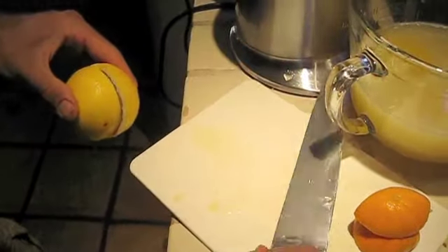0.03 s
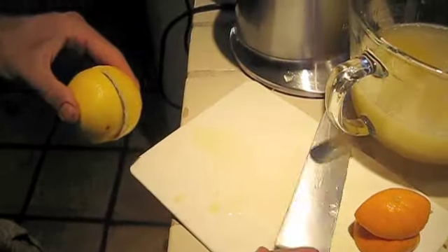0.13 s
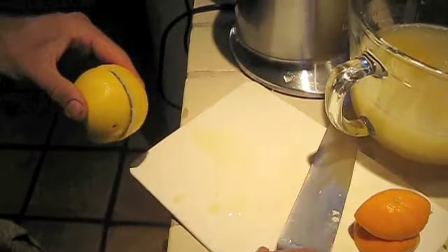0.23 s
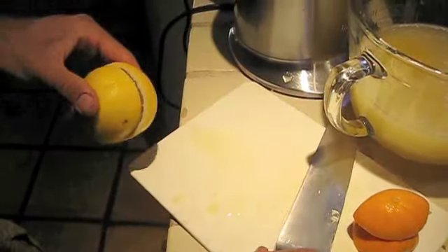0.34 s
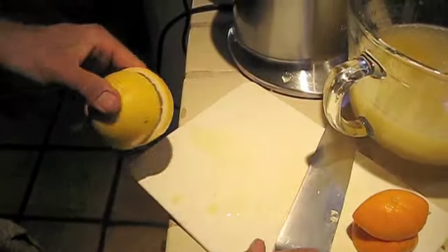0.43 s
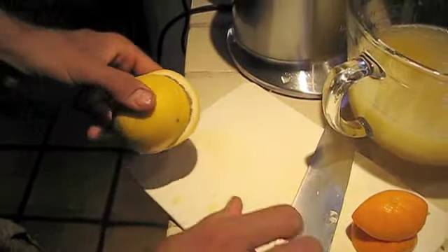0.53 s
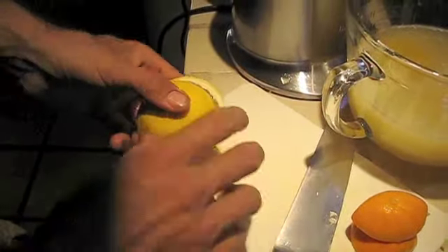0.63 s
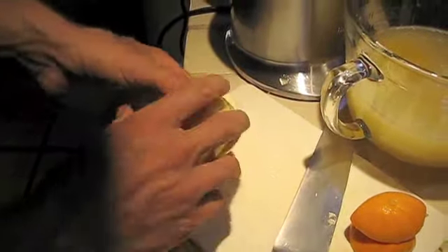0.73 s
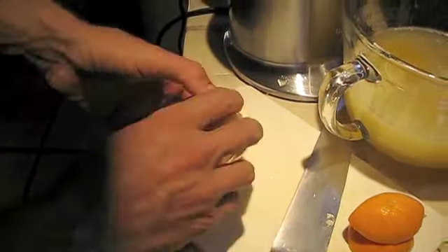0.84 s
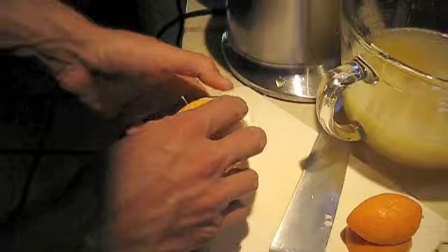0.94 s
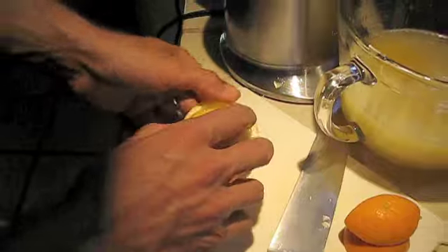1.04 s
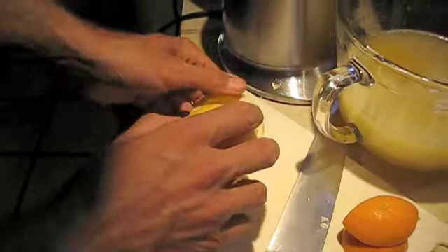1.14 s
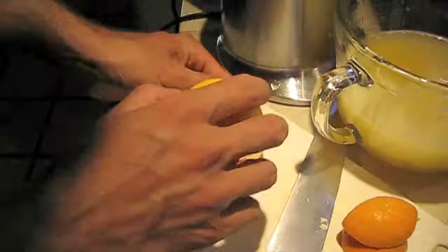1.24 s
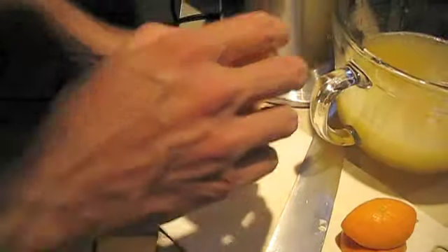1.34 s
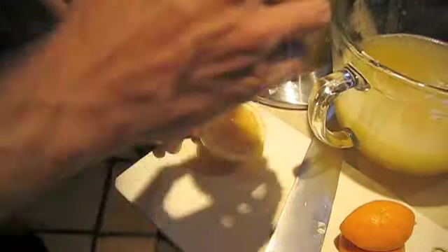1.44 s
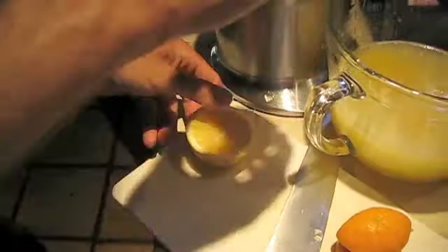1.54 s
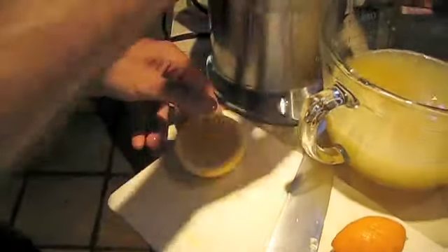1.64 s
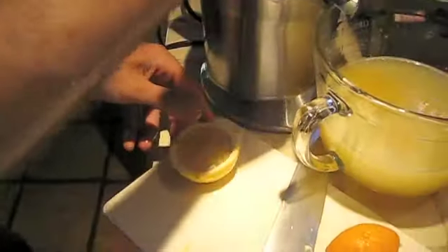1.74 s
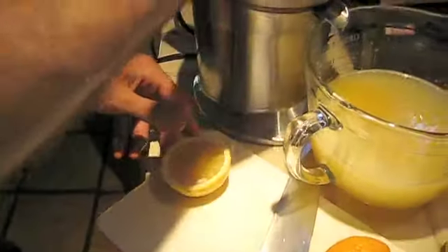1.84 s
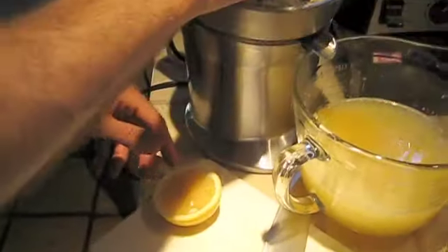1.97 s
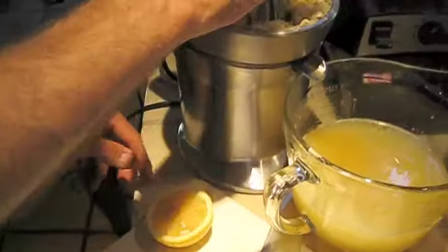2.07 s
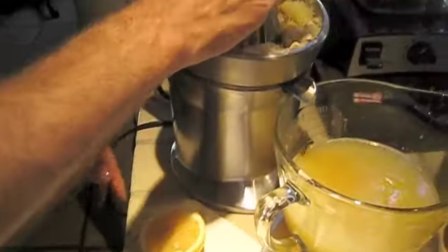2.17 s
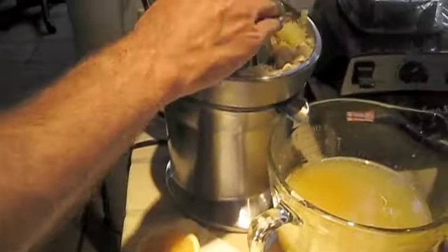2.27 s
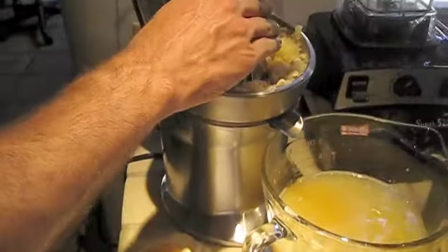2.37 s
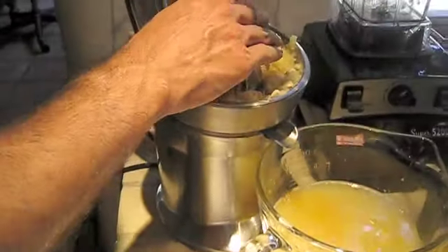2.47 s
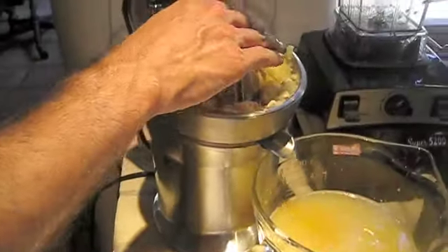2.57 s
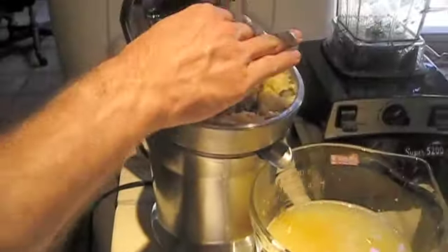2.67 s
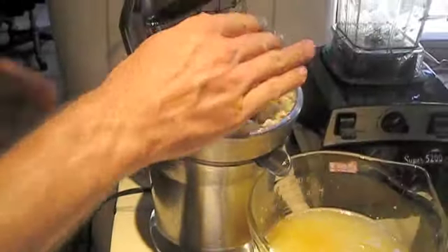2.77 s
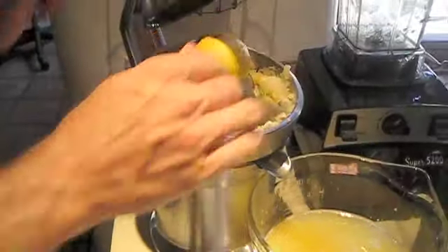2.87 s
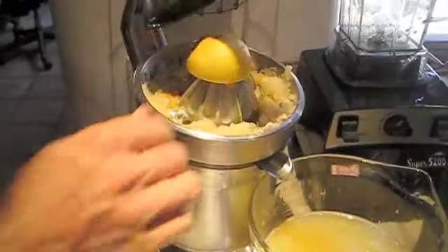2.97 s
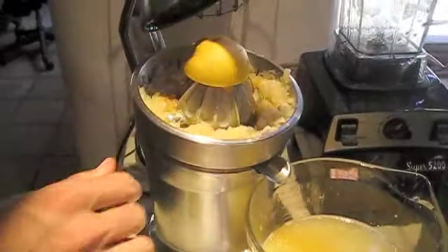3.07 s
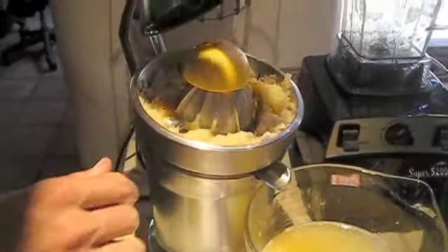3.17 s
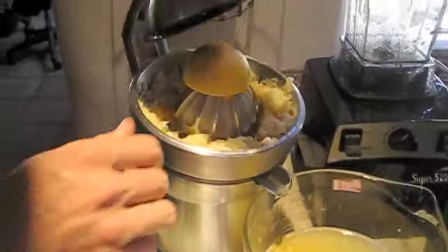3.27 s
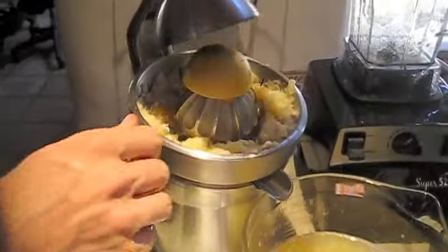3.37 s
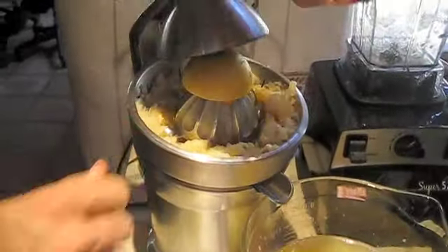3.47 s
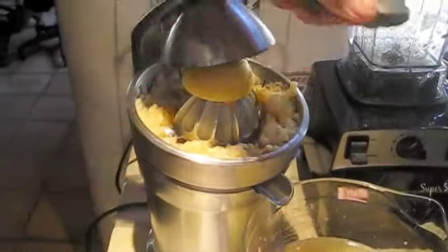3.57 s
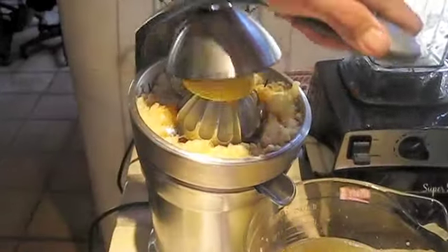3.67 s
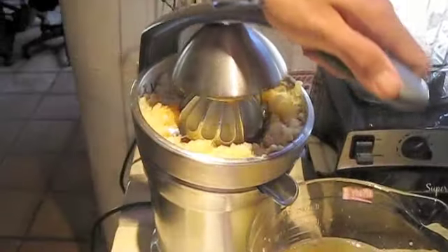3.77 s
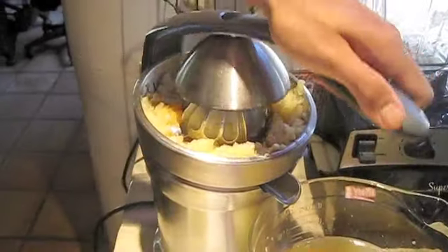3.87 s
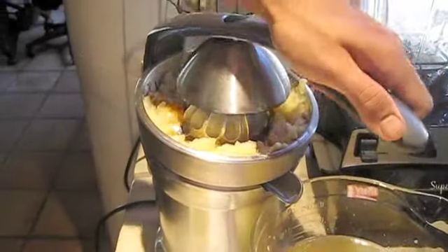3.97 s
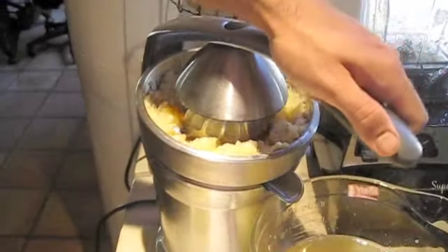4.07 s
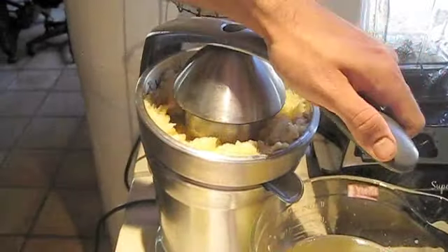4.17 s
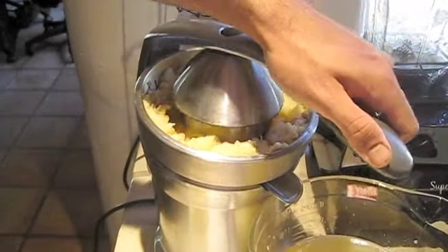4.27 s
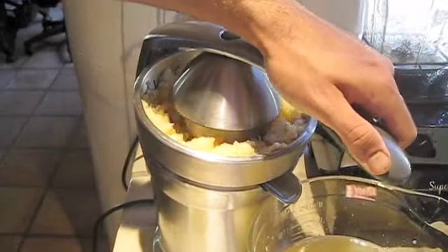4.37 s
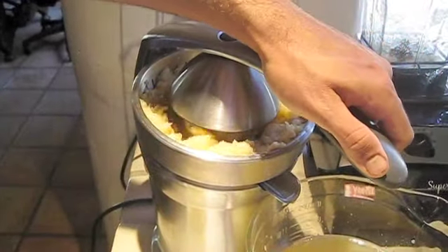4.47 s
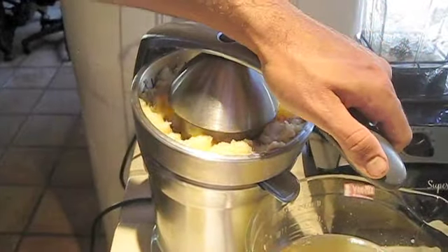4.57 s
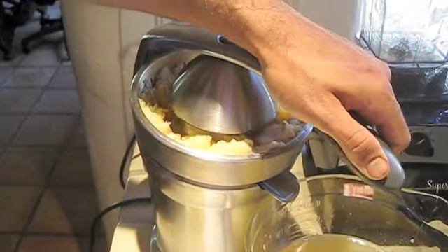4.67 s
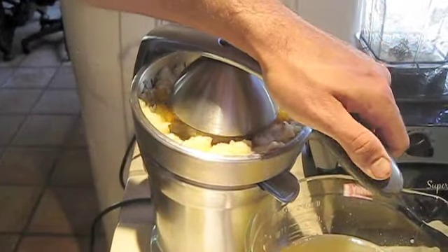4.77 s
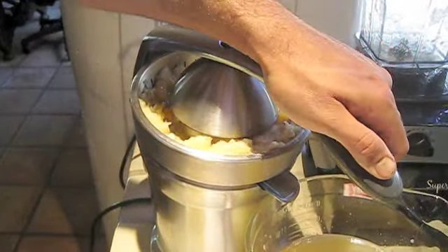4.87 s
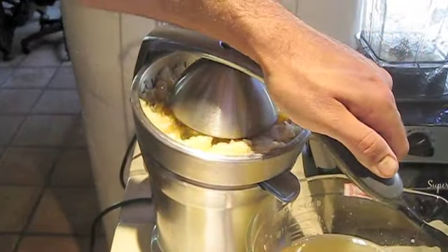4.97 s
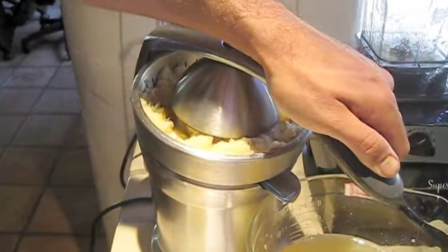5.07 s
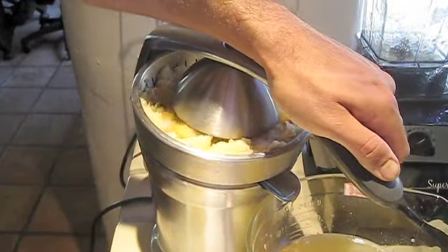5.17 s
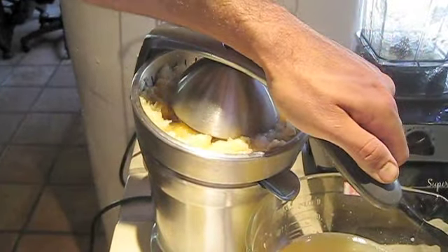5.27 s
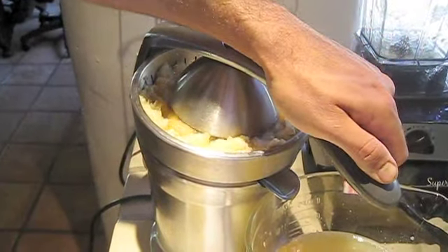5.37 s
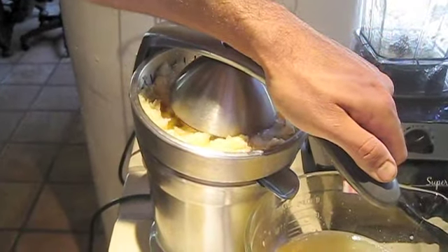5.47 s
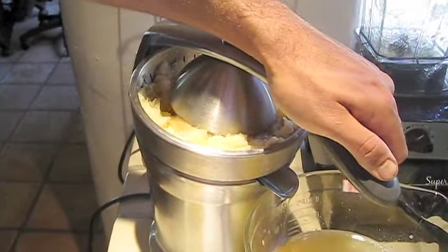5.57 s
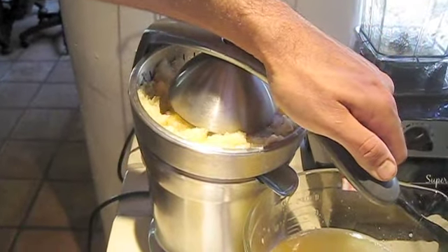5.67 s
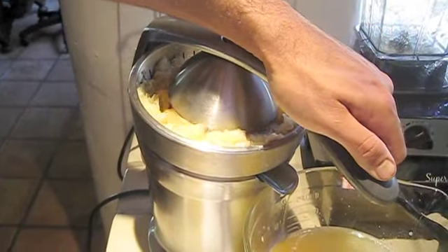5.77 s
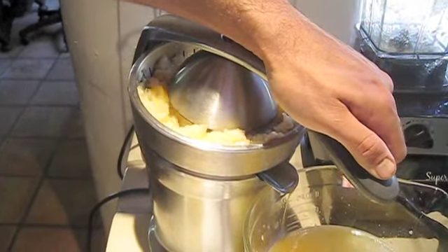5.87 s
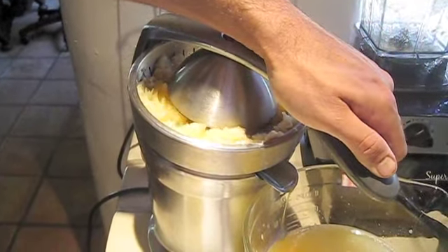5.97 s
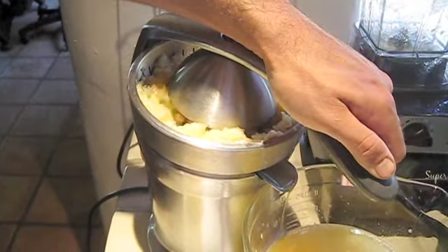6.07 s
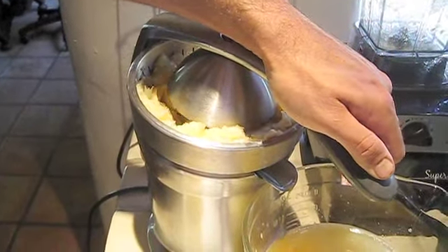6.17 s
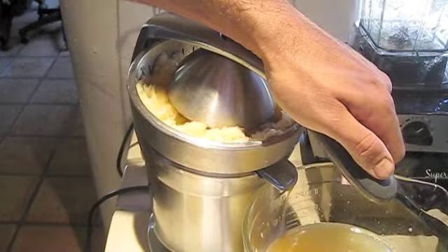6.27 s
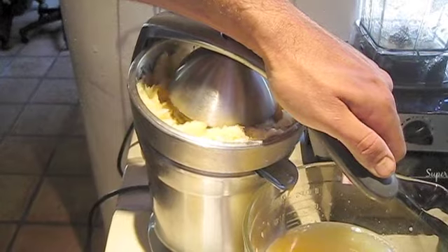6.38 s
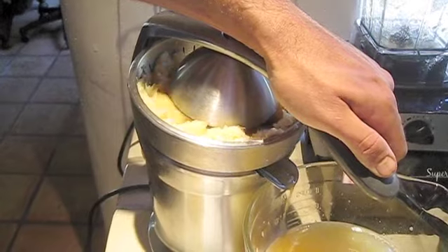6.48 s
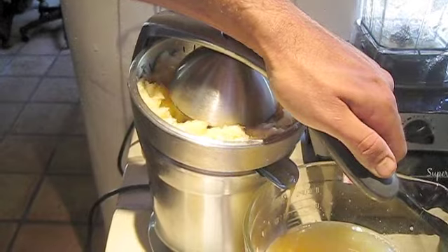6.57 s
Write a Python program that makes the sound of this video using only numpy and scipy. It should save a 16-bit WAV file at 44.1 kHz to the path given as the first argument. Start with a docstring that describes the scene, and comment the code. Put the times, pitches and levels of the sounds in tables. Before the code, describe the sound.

Close kitchen sounds: blade scrape and board knocks, soft tearing of a lemon, sharp metal clicks, then a motorized citrus juicer grinding wet pulp steadily.

```python
"""Lemon on an electric juicer

A kitchen knife slides in jerks onto a cutting board; a lemon is torn in two and a half is set on the juicer.
The steel lever clicks, the rind squeaks by stick-slip, and a geared motor spins up, whining at its tooth rate.
Noise grains through resonances make the grinding and spatter; bursts of contact noise make knocks and pops.
All is within arm's reach in a small kitchen; the microphone has a narrow notch in the treble.
"""
import sys
import numpy as np
from scipy import signal
from scipy.fft import rfft, irfft, next_fast_len
from scipy.io import wavfile
from scipy.ndimage import map_coordinates

SR = 44100
rng = np.random.default_rng(int(sys.argv[2]) if len(sys.argv) > 2 else 0)


def master_out(mix):
    """Clip the mix to full scale and print it as 16-bit PCM to the path in sys.argv[1]."""
    frames = np.transpose(np.atleast_2d(mix))
    ceiling = np.clip(frames, -1, 1)
    pcm = np.round(ceiling * 32767).astype(np.int16)
    wavfile.write(sys.argv[1], SR, pcm)


N = 291573  # length in samples
TOP_HZ = 15700  # upper limit of the microphone

# Colour of wet spatter and fine hiss. Each row: frequency in Hz, level in dB.
SPRAY = [(3820, -21), (6500, -1.5), (7250, -11.5), (7910, -13), (8460, -9.5), (9800, -2), (11900, 2.5),
         (15200, -20), (16000, -13)]
# Bright colour of hard contacts. Each row: frequency in Hz, level in dB.
STEEL = [(4120, -25.5), (7000, -17), (7790, -17), (8800, -15), (9890, -12), (11900, -4.5), (14100, -38),
         (16000, -66)]
# The fingers never quite rest. One row: start in seconds, length in seconds, attack in seconds per 20 dB,
# then the levels of hollow rubbing, tearing and wet fizz in dB.
FIDGET = (2.16, 1, 4, -68, -64, -59.5)

START_S, SPIN_UP_S = 4.145, 0.14  # the motor is switched on and runs up
SEAT_S, SEATING_S = 4.76, 0.5  # the fruit sinks fully onto the reamer
# each sound of the juicer: (dB at first touch, dB gained at full pressure, attack in s)
WHINE, GRINDING, SHUDDER, SPATTER = (-40.5, 7.6, 0.09), (-29.5, 1.75, 0.099), (-50, 7.4, 0.058), (-38, 0.36, 0.16)


def amp(db):
    """Decibels to gain."""
    return 10 ** (np.asarray(db) / 20)


def unit(x):
    """Scale to rms 1."""
    return x / np.sqrt(np.mean(x ** 2) + 1e-20)


def crest(x):
    """Scale to peak 1."""
    return x / (np.abs(x).max() + 1e-12)


def along(points, hz):
    """Interpolate (Hz, value) points on a log frequency axis."""
    f, v = np.transpose(points)
    return np.interp(np.log(hz + 1), np.log(f + 1), v)


def wobble(rate, size=N):
    """A smooth random curve, rate knots a second."""
    knots = rng.standard_normal(int(size * rate / SR) + 4)
    fine = np.arange(0, len(knots) - 1, 0.125)
    curve = map_coordinates(knots, [fine])
    return np.interp(np.arange(size) * rate / SR, fine, curve)


def filtered(x, response):
    """Apply a response given as a function of frequency."""
    m = next_fast_len(len(x) + 8192)
    return irfft(rfft(x, m) * response(np.fft.rfftfreq(m, 1 / SR)), m)[:len(x)]


def coloured(x, spectrum):
    """Shape x with a (Hz, dB) spectrum, rms 1."""
    return unit(filtered(x, lambda f: amp(along(spectrum, f))))


def resonate(x, modes):
    """Pass x through parallel (Hz, width in Hz, dB) resonances of alternating sign, rms 1."""
    def response(f):
        return sum((-1) ** k * amp(db) * 1j * f * width / (hz * hz - f * f + 1j * f * width)
                   for k, (hz, width, db) in enumerate(modes))
    return unit(filtered(x, response))


def grains(rate, unevenness):
    """Random impulses, rate a second; positive unevenness gives a few large ones, zero equal ones."""
    place, sign, size = rng.random((int(rate * N / SR), 3)).T
    strength = (2 * sign - 1) * amp(2.94 * unevenness * size ** 2)
    return unit(np.bincount((place * N).astype(int), strength, N))


def burst(t60):
    """A dying rattle of contact noise."""
    t = np.arange(SR // 5) / SR
    return np.sign(rng.standard_normal(len(t))) * amp(-60 * t / max(t60, 1e-3))


def add(track, s, sound):
    """Mix a sound in at time s."""
    part = track[max(round(s * SR), 0):][:len(sound)]
    part += sound[:len(part)]


def swell(start, length, attack, release):
    """Attack, hold and release; the two slopes are times for 20 dB."""
    t = np.arange(N) / SR
    before = (start - t) / max(attack, 1e-3)
    after = (t - start - length) / max(release, 1e-3)
    return amp(-20 * np.maximum(0, np.maximum(before, after)))


def ramp(start, length):
    """A straight rise from 0 to 1."""
    return np.clip((np.arange(N) / SR - start) / max(length, 1e-3), 0, 1)


def driven(sound):
    """Gain of a juicer sound: it comes in with the motor and grows with the pressure on the fruit."""
    db, pressed_db, attack = sound
    return ramp(START_S, attack) * amp(db + pressed_db * ramp(SEAT_S, SEATING_S))


def motor(wheel_hz=14.3, sway=0.0093, whine_db=-0.5, surge_db=11, hum_db=-1, mains_hz=240, mains_db=-55.5):
    """Gear teeth whine over mains hum, harsher at run-up; an eccentric wheel sways their pitch once a turn."""
    # Gear mesh. Each row: multiple of the mesh rate, level in dB.
    mesh = [(1, -4), (2, -5.5), (3, -16)]
    # Gearbox tones. Each row: frequency in Hz once the motor is up to speed, level in dB.
    gearbox = [(393, -20.5), (658, -20), (826, -13), (909, -10.5), (937, -15), (974, -8), (1034, -15.5)]
    free_hz, loaded_hz, sag_s = 911.5, 854.2, 0.3  # the gear mesh slows as the reamer bites
    t = np.arange(N) / SR
    run_up = np.pi / 2 * ramp(START_S, SPIN_UP_S)
    running = np.sin(run_up)
    torque = np.sqrt(np.abs(np.cos(run_up)))
    sag = np.exp(-np.maximum(t - START_S - SPIN_UP_S, 0) / sag_s)
    mesh_hz = running * (loaded_hz + (free_hz - loaded_hz) * sag)

    # wheel_hz is the turning rate at the loaded speed
    turns = np.cumsum(wheel_hz * mesh_hz / loaded_hz) / SR
    wheel = np.sin(2 * np.pi * turns + 0.86 * wobble(6.6))
    phase = 2 * np.pi * np.cumsum(mesh_hz * (1 + sway * wheel + 0.0039 * wobble(90))) / SR
    # torque lifts the upper multiples and lowers the first
    teeth = sum(amp(db + surge_db * torque * (k - 1.5) + 1.5 * wobble(45)) * np.sin(round(k) * phase)
                for k, db in mesh)
    run_time = np.cumsum(running) / SR
    hum = sum(amp(db + 1.6 * wobble(12)) * np.sin(2 * np.pi * hz * run_time + 0.5 * wobble(14))
              for hz, db in gearbox)
    mains = amp(mains_db) * running * np.sin(2 * np.pi * mains_hz * t)
    gears = driven(WHINE) * (amp(whine_db) * teeth + amp(hum_db) * hum)
    return np.sqrt(2) * (gears + mains), wheel, phase


def reamer(wheel, phase, housing_db=-3, rasp_db=-5, rumble_db=-2, spray_db=-1, clump_db=5.0, spurt_db=1.1):
    """The ribs grind the pulp, shaking the steel housing in time with the gears; juice sacs crackle in clumps."""
    # Housing resonances. Each row: frequency in Hz, width in Hz, level in dB.
    housing_modes = [(1335, 20, 1), (1712, 118, 4), (2432, 58, 5), (2569, 88, 4), (2795, 55, 3.5),
                     (3010, 87, 0.5), (3588, 85, -1), (4615, 60, -9), (4827, 60, -1.5), (5273, 76, -4.5)]
    # Colour of the grinding rasp. Each row: frequency in Hz, level in dB.
    rasp_colour = [(410, -27), (700, -23.5), (838, -6.5), (1100, -3.5), (1700, -2), (2180, -4), (2510, -6),
                   (5100, -12.5), (7600, -26.5), (9880, -47.5), (16700, -120)]
    # Colour of the low shudder. Each row: frequency in Hz, level in dB.
    rumble_colour = [(65, -63.5), (110, -17.5), (242, -13), (483, -13.5), (780, -5), (850, -18),
                     (1100, -43), (1870, -120)]
    drag = amp(0.1 * wheel + 1.1 * wobble(40))
    tooth_force = 1 + 0.5 * np.sin(phase)
    housing = resonate(grains(7000, unevenness=6.0) * drag * tooth_force, housing_modes)
    # the housing sounds mostly between 900 and 6500 Hz
    housing = unit(filtered(housing, lambda f: 1 / (1 + (900 / (f + 1)) ** 4) / (1 + (f / 6500) ** 4)))
    rasp = coloured(grains(5000, unevenness=1) * drag, rasp_colour)
    clumps = amp(clump_db * np.minimum(wobble(260), 2) + spurt_db * wobble(17))
    crackle = coloured(grains(7000, unevenness=3.5) * drag * clumps, SPRAY)
    shudder = coloured(grains(2000, unevenness=-0.5) * drag, rumble_colour)
    return (driven(GRINDING) * (amp(housing_db) * housing + amp(rasp_db) * rasp)
            + amp(rumble_db) * driven(SHUDDER) * shudder
            + amp(spray_db) * driven(SPATTER) * crackle)


def bubbles(rows, t60, width, level_db):
    """Wet pockets burst, each exciting one broad resonance; width is a share of its pitch."""
    out = np.zeros(N)
    for s, db, hz in rows:
        cavity = [(hz, width * hz, 0)]
        add(out, s, amp(db + level_db) * crest(resonate(resonate(burst(t60), cavity), cavity)))
    return out


def pops():
    """Large pockets of pulp burst against the reamer, each a short broad resonance."""
    # Each row: time in seconds, relative level in dB, pitch in Hz.
    pockets = [(4.464, -16, 3450), (4.789, -16, 1220), (4.9055, -13.5, 1298), (4.9651, -15.5, 1860),
               (4.9856, -15.5, 2370), (5.0022, -13.5, 2590), (5.1213, -14, 1460), (5.1991, -14, 1756),
               (5.95, -12.5, 2780), (6.342, -13.5, 1310)]
    return bubbles(pockets, t60=0.03, width=0.36, level_db=-1)


def plops():
    """Pulp and juice plop into the jug, each a longer, mostly lower resonance."""
    # Each row: time in seconds, relative level in dB, pitch in Hz.
    drops = [(4.634, -31, 600), (5.196, -26, 715), (5.205, -33, 233), (5.434, -35, 274), (5.657, -21, 640),
             (5.763, -19.5, 716), (5.874, -23.5, 626), (6.064, -27.5, 650)]
    return bubbles(drops, t60=0.072, width=0.39, level_db=-2.0)


def squelches(rate=45, level_db=1.0, spread_db=2, low_hz=1200, high_hz=4500):
    """Many small pockets of pulp collapse at random, harder as the grinding grows."""
    chance = rng.random((400, 3))
    times = START_S + np.cumsum(-np.log(1 - chance[:, 0])) / rate
    grind = np.interp(times, np.arange(N) / SR, driven(GRINDING))
    db = 20 * np.log10(grind + 1e-9) + spread_db * np.minimum(-np.log(1 - chance[:, 1]), 2)
    hz = low_hz * (high_hz / low_hz) ** chance[:, 2]
    rows = np.transpose([times, db, hz])
    return bubbles(rows[times < N / SR], t60=0.019, width=0.28, level_db=level_db)


def pith_snaps(rate=14, level_db=10, spread_db=3, t60=0.0058, centre_hz=2400, width=1.34):
    """Strands of pith snap against the ribs: sharp ticks that stand out of the grinding."""
    gap, size = rng.random((70, 2)).T
    times = START_S + np.cumsum(2 * gap) / rate
    rows = [(s, db, centre_hz) for s, db in zip(times, spread_db * (2 * size - 1))]
    return bubbles(rows, t60, width, level_db) * driven(GRINDING)


def squeaks(overtone_db=-10, fall_db=-3, jitter=0.0091, rasp_width=0.76, rasp_top_db=-7):
    """Stick-slip of rind and knife edge: a short rising tone with overtones, breaking into a rasp."""
    # Each row: start in seconds, length in seconds, pitch in Hz, level in dB, roughness from 0 to 1.
    slips = [(0.045, 0.04, 1060, -42, .45), (0.218, 0.033, 2130, -27.5, .5),
             (1.012, 0.031, 2030, -44, 0.54), (1.048, 0.01, 2110, -30, 0.5),
             (1.049, 0.0097, 3100, -37, 0.2), (1.664, 0.0081, 3780, -39.5, 0.46),
             (2.456, 0.096, 4100, -46, 0.38), (2.861, .016, 3920, -45, 0), (3.78, 0.031, 4310, -46, 0.56),
             (4.023, .03, 2380, -27.5, 0), (4.024, 0.031, 4650, -29.5, .3), (4.032, 0.033, 2890, -20, 0.75),
             (4.042, .059, 2993, -20.5, 0.07), (4.09, 0.05, 1760, -29.5, 0.24),
             (4.096, 0.0257, 3520, -42, 0.05), (4.112, 0.02, 2926, -28, 0.5),
             (4.145, 0.03, 2660, -26.5, 0.24), (4.174, 0.029, 1306, -36, 0.47)]
    pitch_rise = 0.055  # share by which the pitch climbs as the grip tightens
    out = np.zeros(N)
    for s, length, hz, db, rough in slips:
        u = np.linspace(0, 1, max(int(length * SR), 64))
        rough = np.clip(rough, 0, 1)
        unsteady = 1 + jitter * (1 + 4 * rough) * wobble(780, size=len(u))
        pitch = hz * (1 + pitch_rise * (u - 0.5)) * unsteady
        phase = 2 * np.pi * np.cumsum(pitch) / SR
        overtones = sum(amp(overtone_db + fall_db * k) * np.sin((k + 2) * phase)
                        for k in range(4) if (k + 2) * hz < TOP_HZ)
        tone = np.sin(phase) + overtones
        band = [(hz, rasp_width * hz, 0)]
        rasp = resonate(resonate(rng.standard_normal(len(u)), band), band)
        rasp = rasp + amp(rasp_top_db) * coloured(rng.standard_normal(len(u)), SPRAY)
        arch = np.abs(np.sin(np.pi * u)) ** 0.75
        add(out, s, amp(db) * arch * (np.sqrt(1 - rough) * unit(tone) + np.sqrt(rough) * rasp))
    return out


def clicks(ring_db=-27, t60=0.026):
    """Hard contacts of steel and plastic: a bright snap with a faint steel ring over the body of the frame."""
    # Each row: time in seconds, level in dB, share of the body in dB (capped below).
    contacts = [(0.191, -14, -12), (0.2565, -12.5, -2), (0.269, -7, -1.5), (1.053, -42, -8),
                (1.73, -36, -16), (2.279, -33, -4), (2.725, -20, -3.5), (2.765, -34, -15), (3.3032, -26, 1),
                (3.352, -20, -2), (3.5919, -24.5, -8), (3.8339, -4.5, -13.5), (3.8918, -20.5, -7),
                (4.139, -7, -17), (4.693, -17, -6)]
    # Colour of the frame. Each row: frequency in Hz, level in dB.
    frame = [(700, -50), (1600, 1), (2600, 8), (3400, 7.5), (4400, 12.5), (5400, 12.5), (7400, -19),
             (9000, -14.5)]
    out = np.zeros(N)
    for s, db, body_db in contacts:
        share = np.clip(amp(body_db), 0, 0.95)
        snap = crest(coloured(burst(t60) + amp(ring_db) * burst(0.143), STEEL))
        body = crest(coloured(burst(t60), frame))
        add(out, s, amp(db) * (np.sqrt(1 - share ** 2) * snap + share * body))
    return out


def thuds():
    """Fruit and lever thud on the pulp-damped bowl; softer contacts favour its lower modes."""
    # Each row: time in seconds, peak in dB, contact centre in Hz, contact width in Hz, contact t60 in seconds.
    impacts = [(2.713, -34, 1800, 1300, .07), (2.7239, -16, 1780, 1200, 0.041),
               (2.726, -20.5, 630, 525, 0.044), (2.7509, -27.5, 620, 450, 0.042),
               (3.385, -27, 1700, 500, 0.032), (3.424, -18.5, 1420, 600, 0.029)]
    # Bowl resonances. Each row: frequency in Hz, width in Hz, level in dB.
    bowl = [(203, 65, 0), (630, 135, -2), (1110, 104, 1), (1335, 93, -2.5), (1750, 350, -2.5),
            (3040, 340, -2.5), (4250, 890, -5.5)]
    out = np.zeros(N)
    for s, db, hz, width, t60 in impacts:
        contact = resonate(burst(t60), [(hz, width, 0)])
        add(out, s, amp(db) * crest(resonate(contact, bowl)))
    return out


def handling(grip_db=4.0):
    """Wet flesh rubs and tears, gripping unevenly, as the halves are parted and seated."""
    # Strokes of the hands on the wet fruit. Each row: start in seconds, length in seconds,
    # attack in seconds per 20 dB, then the levels of hollow rubbing, tearing and wet fizz in dB.
    strokes = [(1.196, 0.039, 0.062, -37.5, -43, -48.5), (1.406, 0.009, 0.0047, -47, -35, -49),
               (1.45, .035, 0.033, -48.5, -48.5, -60), (1.712, 0.04, .08, -55, -60, -58),
               (1.946, 0.0103, 0.014, -51, -53, -66), (2.427, 0.02, 0.098, -57, -47, -45),
               (2.467, 0.031, .05, -57, -51, -53), (2.963, 0.038, 0.04, -65, -51.5, -57),
               (3.46, 0.155, 0.25, -55.5, -55, -54), (3.888, 0.043, 0.024, -53, -50.5, -46)]
    # The hollow under the hand. Each row: frequency in Hz, level in dB.
    hollow = [(400, -41), (800, -7), (1130, 1), (1360, -8), (1560, 4.5), (1920, -9), (3600, -24),
              (7500, -38)]
    # Colour of tearing flesh. Each row: frequency in Hz, level in dB.
    tearing = [(900, -47.5), (2200, -2), (3600, 1), (4600, -4.5), (7000, -11.5), (10000, -45)]
    slower_s = 0.044  # a stroke dies this much more slowly than it rises
    layers = [np.outer(amp(levels), swell(s, length, attack, attack + slower_s))
              for s, length, attack, *levels in list(strokes) + [FIDGET]]
    rub, tear, fizz = np.max(layers, axis=0)
    return (rub * coloured(grains(4000, unevenness=7), hollow)
            + amp(grip_db * wobble(35.56)) * tear * coloured(grains(2500, unevenness=0.0), tearing)
            + fizz * coloured(grains(1500, unevenness=-3.5), SPRAY))


def finger_ticks(rate=11, level_db=-42, spread_db=3, low_hz=1500, high_hz=5500):
    """Sticky fingers let go of the rind with faint ticks and chirps."""
    start, length = FIDGET[:2]
    gap, size, pitch = rng.random((80, 3)).T
    times = start + np.cumsum(2 * gap) / rate
    hz = low_hz * (high_hz / low_hz) ** pitch
    rows = np.transpose([times, spread_db * (2 * size - 1), hz])
    return bubbles(rows[times < start + length], t60=0.035, width=0.3, level_db=level_db)


def knife(flutter_db=4.0, jitter=0.54, chatter_db=-14, hiss_db=-11, damped_db=-17, light_grit_db=-11):
    """The edge drags over the board: friction keeps the blade ringing and turns gritty as it presses."""
    # Blade tones. Each row: frequency in Hz, level in dB.
    blade_modes = [(1981, -48.5), (2681, -41.5), (3348, -38.5), (4377, -40), (5265, -40.5), (6132, -39),
                   (7025, -38), (8048, -45.5), (9049, -49.5), (10174, -50), (10584, -60), (10890, -40),
                   (11310, -47), (12500, -45), (13614, -48), (14955, -50)]
    # The blade pressed flat. Each row: frequency in Hz, width in Hz, level in dB.
    scrape_modes = [(1760, 290, -12), (2070, 140, -2.5), (2740, 177, 2.5), (3400, 170, 5.5),
                    (3770, 390, 2.5), (10700, 740, 3.5), (11800, 940, -1.5), (13300, 460, 2)]
    # The knife slides in jerks. Each row: start in seconds, length in seconds, level in dB.
    slides = [(0.004, 0.048, -28), (0.115, 0.0092, -32), (0.144, 0.026, -28.5), (0.163, .008, -30),
              (.182, 0.012, -20.5), (0.203, 0.028, -23.5)]
    attack_s, release_s, drag_db = 0.015, 0.022, -43  # slopes over 20 dB; light contact between the jerks
    bite_s, bite_time, laid_down_s = 0.1904, 0.006, 0.256  # pressed flat, which damps the ring; laid to rest
    size = SR // 2
    jerks = [swell(s, length, attack_s, release_s) * amp(db) for s, length, db in slides]
    light_drag = amp(drag_db) * swell(0, laid_down_s, attack_s, release_s)
    friction = np.max(jerks + [light_drag], axis=0)[:size]
    flat = ramp(bite_s - bite_time / 2, bite_time)[:size]
    ring = friction * amp(damped_db * flat)
    scrape = friction * amp(light_grit_db * (1 - flat))

    t = np.arange(size) / SR
    blade = sum(amp(db + flutter_db * wobble(61, size))
                * np.sin(2 * np.pi * hz * t + wobble(34.0, size) + jitter * wobble(400, size))
                for hz, db in blade_modes)
    chatter = resonate(rng.standard_normal(size), [(hz, 90, db) for hz, db in blade_modes])
    hiss = coloured(rng.standard_normal(size), SPRAY)
    grit = resonate(rng.standard_normal(size), scrape_modes) * amp(1.3 * wobble(199, size))
    edge = ring * (unit(blade) + amp(chatter_db) * chatter + amp(hiss_db) * hiss) + scrape * grit
    # a thin blade radiates no bass
    edge = filtered(edge, lambda f: 1 / (1 + (1000 / (f + 1)) ** 4))
    return np.pad(edge, (0, N - size))


def knocks(tick_db=-5):
    """Knife and fruit knock on the board: each blow rings the board and the worktop under it."""
    # Each row: time in seconds, body peak in dB, relative level of the treble tick in dB, contact t60 in seconds.
    blows = [(0.257, -15, -3, 0.1), (0.265, -14.5, -17, 0.046), (0.315, -19, -1.5, 0.05),
             (0.33, -20.5, -30, 0.16), (1.297, -18.5, -32.5, 0.034)]
    # Board resonances. Each row: frequency in Hz, width in Hz, level in dB.
    board = [(250, 89, -11), (702, 240, -4), (1037, 87, 6), (1610, 230, -5.5), (2236, 670, -10),
             (3400, 630, -9.5)]
    out = np.zeros(N)
    for s, db, treble_db, t60 in blows:
        body = crest(resonate(burst(t60), board))
        tick = crest(coloured(burst(0.014), STEEL))
        add(out, s, amp(db) * (body + amp(treble_db + tick_db) * tick))
    return out


def kitchen(x):
    """The small kitchen answers with a short diffuse tail, each band dying at its own rate."""
    # Each row: frequency in Hz, t60 in seconds.
    decay = [(200, 0.99), (1000, 0.22), (4000, 0.44), (12000, 0.26)]
    hz, t, z = signal.stft(rng.standard_normal(SR // 2), SR, nperseg=256)
    fading = z * amp(-60 * t / along(decay, hz)[:, None])
    tail = signal.istft(fading, SR, nperseg=256)[1]
    # the tail starts 5 ms after the direct sound
    return signal.fftconvolve(x, np.pad(tail / np.linalg.norm(tail), (SR // 200, 0)))[:N]


def room_hiss(level_db=-50):
    """The steady hiss of the room, as coloured noise."""
    # Each row: frequency in Hz, level in dB.
    air = [(12, -30), (20, -6.5), (116, -7), (347, -4), (527, -8), (897, -12), (2020, -12), (4540, -17),
           (6360, -17.5), (7950, -24), (9140, -19), (16000, -27)]
    return amp(level_db) * coloured(rng.standard_normal(N), air)


def scene():
    """Everything happens within arm's reach, over the hiss of the room."""
    gears, wheel, phase = motor()
    juice = pops() + plops() + squelches() + pith_snaps()
    blows = knocks() + thuds()
    hands = handling() + finger_ticks() + squeaks()
    near = knife() + clicks() + hands + reamer(wheel, phase) + juice
    # blows are sent to the room more strongly; the motor tones stay dry
    echo = kitchen(amp(-15.0) * near + amp(-10.5) * blows)
    return (gears + near + blows + echo + room_hiss())[None]


def record(dry, notch_hz=7900, notch_width_hz=450):
    """The microphone port cancels one narrow band; nothing from its upper limit up is kept."""
    def response(f):
        offset = 1j * (f - notch_hz)
        return offset / (notch_width_hz + offset) * (f < TOP_HZ)
    return filtered(dry[0], response)[None]


dry = scene()
out = record(dry)
master_out(out)
```